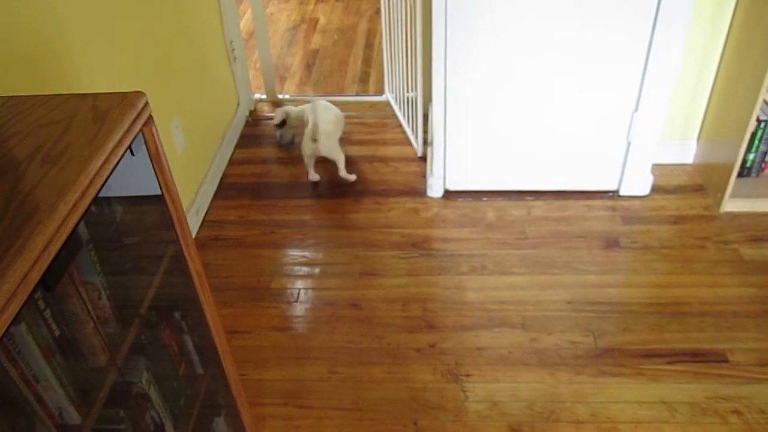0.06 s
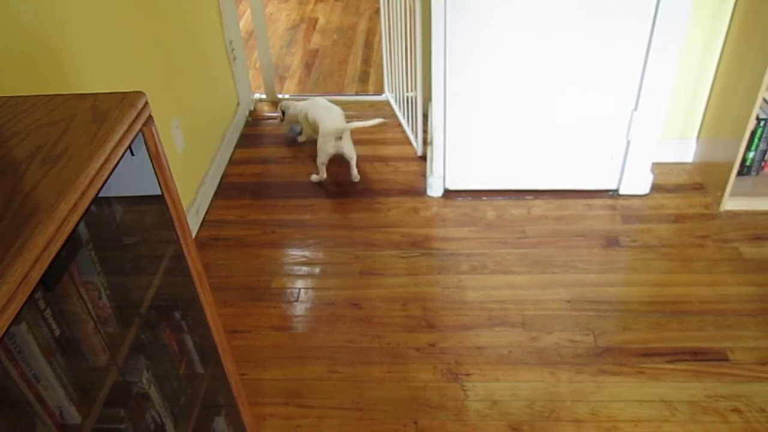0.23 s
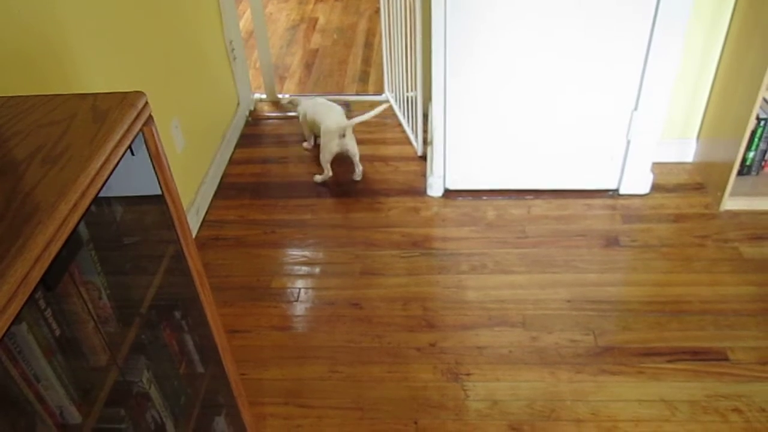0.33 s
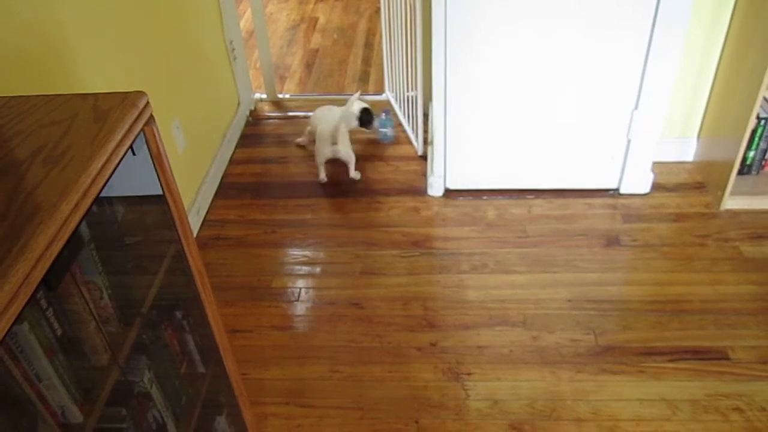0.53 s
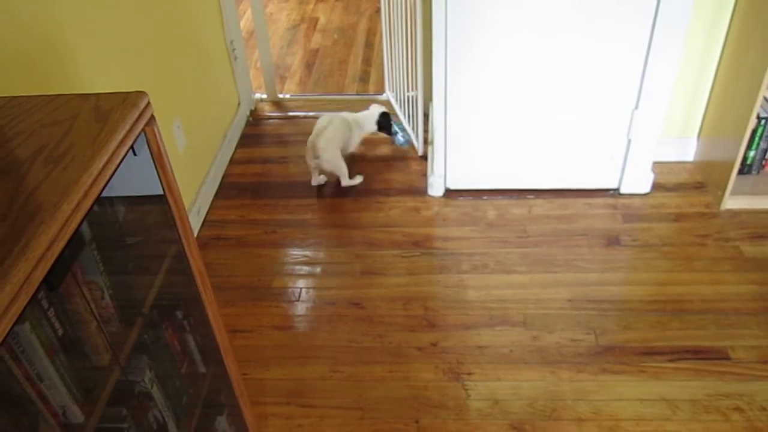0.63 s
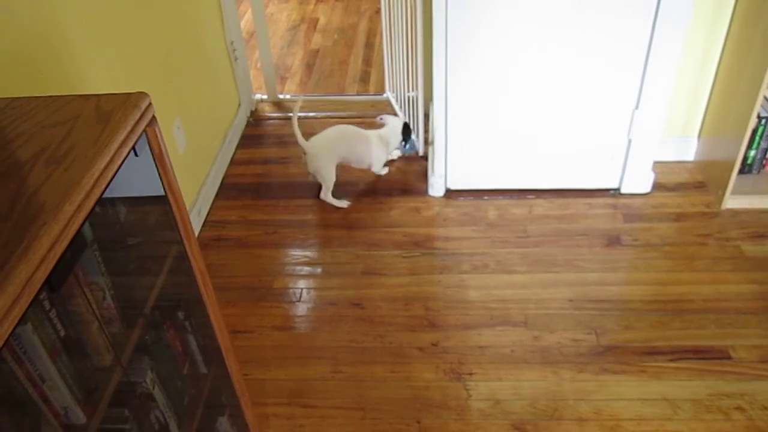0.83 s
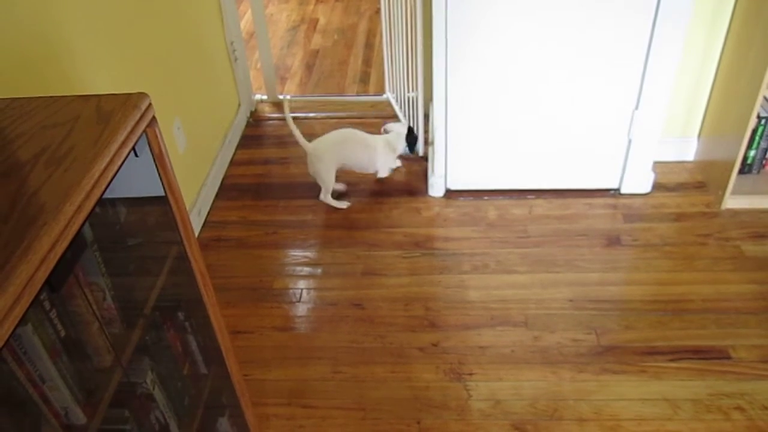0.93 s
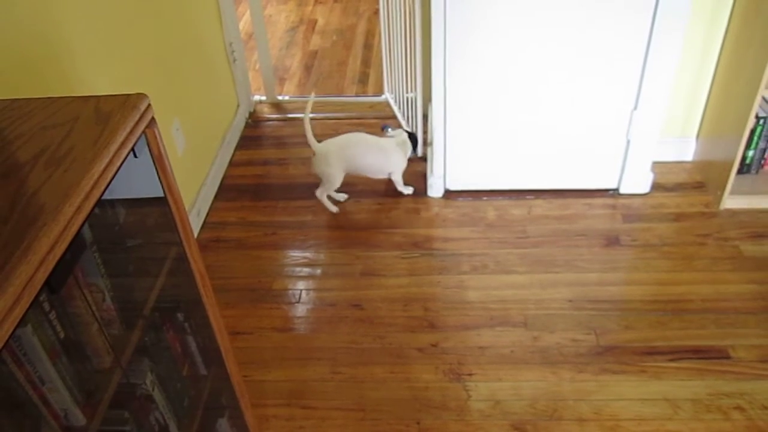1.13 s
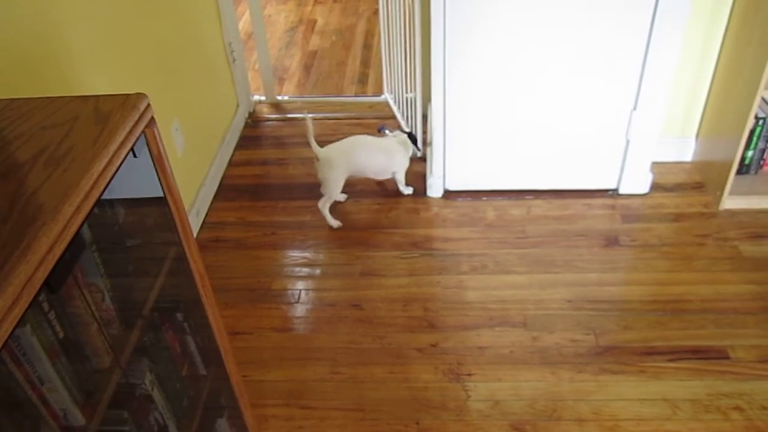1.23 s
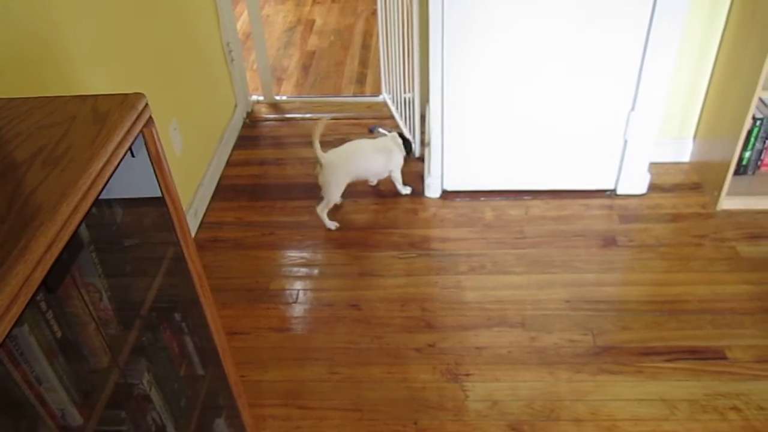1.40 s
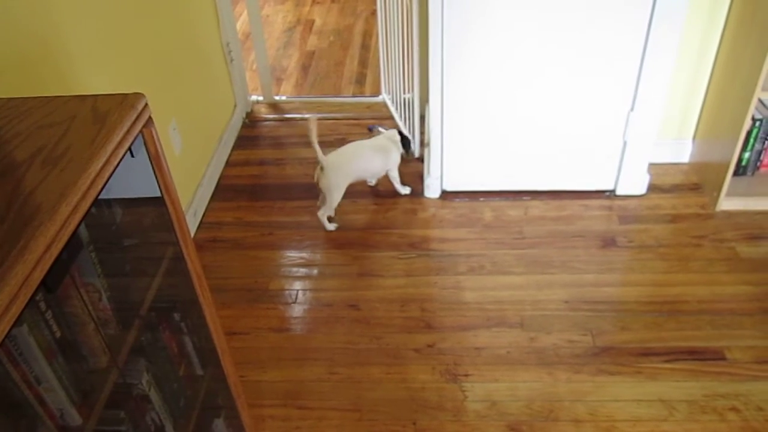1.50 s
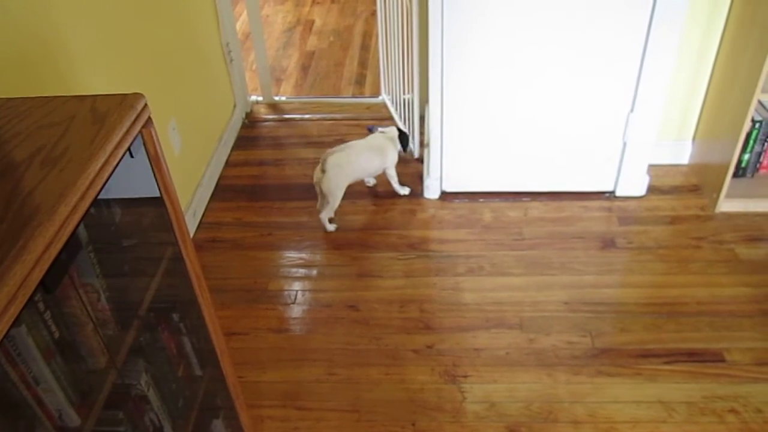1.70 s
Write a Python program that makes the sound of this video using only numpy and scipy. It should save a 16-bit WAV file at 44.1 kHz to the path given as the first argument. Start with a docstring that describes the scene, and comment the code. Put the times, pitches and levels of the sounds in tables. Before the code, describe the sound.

An empty plastic bottle scuffs along a wooden floor, its thin wall crackling sharply at about 0.2 seconds. At 0.5 seconds it lands one loud, hollow knock, then skitters with lighter taps around 0.8 seconds. After a quieter moment, duller bumps cluster near 1.4 seconds. A puppy's paws thump and claws tick throughout, a few metres away in a slightly echoing room with a low hush.

```python
"""A live room with a wooden floor, the microphone a few metres from a puppy chasing an empty plastic bottle.
The bottle scuffs along in tiny slips, a dent in its thin wall snaps, and it lands one hollow knock
that rings its air column and wall; then it skitters on and bumps to rest by a gate.
Paws thump the boards and claws tick between the knocks, over the low hush of the house."""
import sys
import numpy as np
from scipy import signal
from scipy.fft import rfft, irfft
from scipy.io import wavfile

SR = 44100
rng = np.random.default_rng(int(sys.argv[2]) if len(sys.argv) > 2 else 0)


def store_wav(level_fs):
    """Save 16-bit WAV to argv[1]."""
    pcm = np.round(np.clip(np.atleast_2d(level_fs), -1, 1) * 32767)
    wavfile.write(sys.argv[1], SR, pcm.T.astype(np.int16))


N = 77175

# room tone of the house (frequency [Hz], density [dB])
HUSH_SPECTRUM = [(20, -34), (45, -7), (70, -5), (130, -4.5), (300, -4.5), (700, -19), (2000, -25),
                 (6000, -36.5), (15000, -44.5)]
# bottle and paws sliding (start [s], length [s], level [dB], swell [dB], ring over hiss [dB])
SLIDES = [(0, 0.081, -49.5, -11.5, -5.5), (0.123, 0.084, -41, 11.5, -0.5), (0.194, 0.067, -33, 9, -29),
          (0.268, 0.17, -42, -9, -7), (0.411, 0.21, -44.5, -2.5, -5), (0.738, 0.123, -43, 4.5, 3.5),
          (0.973, 0.039, -50.5, -8, -4), (1.022, .12, -50.5, -6, -4), (1.161, 0.066, -52.5, -2.5, 0.5),
          (1.326, .09, -53, 8, 9.5), (1.417, 0.081, -44, -5, -4.5)]
# hiss of sliding (frequency [Hz], density [dB])
SLIDE_SPECTRUM = [(150, -1.5), (600, 4), (1400, 2.5), (2300, 5), (3000, 1.5), (4000, -1.5), (6300, -2.5),
                  (8000, -7), (12000, -10.5), (16000, -26.5)]
# paws and bottle on the boards (time [s], level [dB], treble cutoff [Hz])
FLOOR_THUMPS = [(.002, -39, 220), (0.118, -32.5, 288), (0.149, -33, 238), (0.177, -31, 706),
                (.222, -31.5, 895), (0.253, -36.5, 600), (.445, -37.5, 243), (0.534, -38, 400),
                (0.661, -38.5, 300), (.735, -37, 290), (.775, -35.5, 256), (.84, -32.5, 440),
                (0.896, -33, 296), (.975, -37, 450), (1.071, -41, 400), (1.3, -46.5, 300),
                (1.394, -35.5, 600), (1.425, -28, 554), (1.447, -27.5, 680), (1.476, -31, 600)]
# the floorboards' response (frequency [Hz], density [dB])
BOARD_SPECTRUM = [(40, -9), (100, -20.5), (155, 1.5), (210, -2.5), (330, -2), (480, 5), (580, -5),
                  (680, -4.5), (1200, -12), (4000, -56)]
# bottle contacts, levels before dulling (time [s], ring [dB], slap [dB], treble cutoff [Hz])
BOTTLE_KNOCKS = [(.119, -42, -39.5, 1970), (.19, -41, -40.5, 1230), (.236, -39, -36, 2500),
                 (.49, -45, -38, 990), (0.5328, -8, -11.5, 13800), (.575, -20, -42, 810),
                 (.612, -23.5, -43, 900), (.734, -30.5, -50, 1800), (0.7948, -33, -37, 2910),
                 (.823, -28.5, -30, 2040), (.853, -27.5, -51, 1100), (.885, -37, -37, 1090),
                 (1.3091, -36, -49, 2560), (1.332, -48, -40.5, 2520), (1.3692, -29, -47, 697),
                 (1.398, -27, -37, 694), (1.4225, -17, -23, 705), (1.447, -22, -38, 674),
                 (1.466, -27.5, -27.5, 940)]
# the bottle's air column and wall (frequency [Hz], level [dB], t60 [s])
BOTTLE_MODES = [(498.4, -12, 0.082), (650, -18, 0.13), (754, -13, 0.11), (823, -12, 0.16), (872.7, -3, 0.2),
                (924.4, -3.5, 0.15), (995, -17.5, 0.087), (1677, -15, 0.047), (1742, -6.5, .13),
                (1803, -11, 0.074), (1954, -20, 0.34), (2220, -10.5, 0.067), (2440, -42, 0.11)]
# flat slap of the plastic (frequency [Hz], density [dB])
SLAP_SPECTRUM = [(100, -29), (450, -26.5), (680, -24), (850, 6.5), (1100, 1), (1400, -5), (1750, 4),
                 (2250, -6.5), (2800, -13.5), (5400, -31), (7000, -16), (8500, -31.5), (12000, -26),
                 (16000, -36)]
# claws on wood and plastic (time [s], level [dB])
CLAW_TICKS = [(.1191, -39), (.1575, -38.5), (.1815, -37.5), (.46, -42), (.495, -38), (.538, -27.5),
              (.632, -36), (.7345, -37.5), (.7955, -37.5), (.821, -54), (1.0261, -48), (1.0705, -40.5),
              (1.078, -47), (1.178, -49), (1.306, -46.5), (1.4225, -41.5), (1.475, -40)]
# one claw tick (frequency [Hz], density [dB])
CLAW_SPECTRUM = [(300, -2), (1500, 3.5), (4000, -0.5), (9000, -3), (12000, -10), (16000, -19)]
# dents snapping (time [s], level [dB])
DENT_SNAPS = [(.2205, -31), (.2354, -19.5), (.2408, -20.5), (.2565, -24), (.5335, -30.5)]
# one snap (frequency [Hz], density [dB])
SNAP_SPECTRUM = [(200, -27), (900, -14), (2200, 7), (2900, 0.5), (3600, 8), (5200, 4), (6400, 6),
                 (7300, -3.5), (12000, -6.5), (16000, -44)]
# the room's decay (frequency [Hz], t60 [s])
ROOM_DECAY = [(100, 0.89), (400, 0.39), (900, 0.52), (2000, 0.72), (5000, 0.54), (9000, 0.58),
              (15000, 0.41)]
# reverberation at the microphone (frequency [Hz], tail over direct sound [dB])
ROOM_BALANCE = [(150, 2.5), (900, 0.5), (1800, -2.5), (4000, 2.5), (12000, -3.5)]
# echoes off the near walls (mean delay [s])
WALL_ECHOES = [.0031, .0068, .0135, .0215]

EVENT_SAMPLES = 32768
FFT_SIZE = EVENT_SAMPLES + EVENT_SAMPLES // 4
T = np.arange(EVENT_SAMPLES) / SR
HZ = np.fft.rfftfreq(FFT_SIZE, 1 / SR)


def amp(db):
    """Decibels to gain."""
    return 10 ** (np.asarray(db) / 20)


def along(points, hz):
    """Read a curve on a log frequency axis."""
    freqs, values = np.transpose(points)
    return np.interp(np.log(hz + 1), np.log(freqs), values)


def blow(x):
    """Scale a sound to the energy of 5 ms at full level."""
    return x * np.sqrt(.005 * SR / np.sum(x ** 2))


def colour(spectrum):
    """Causal frequency response with the given shape."""
    cepstrum = irfft(np.log(amp(along(spectrum, HZ))), FFT_SIZE)
    cepstrum[1:FFT_SIZE // 2] *= 2
    cepstrum[FFT_SIZE // 2 + 1:] = 0
    return np.exp(rfft(cepstrum))


def filtered(x, response):
    """A short sound through a frequency response."""
    return irfft(rfft(x, FFT_SIZE) * response, FFT_SIZE)[:EVENT_SAMPLES]


def convolved(x, answer):
    """A short sound through an impulse response."""
    return signal.fftconvolve(x, answer)[:EVENT_SAMPLES]


def add(out, s, x):
    """Mix x into out from time s."""
    i = max(round(s * SR), 0)
    out[i:i + len(x)] += x[:N - i]


def room_tail(build_s=.0092):
    """The diffuse answer of the room, new for every spot on the floor."""
    hz, t, noise = signal.stft(rng.standard_normal(EVENT_SAMPLES), SR, nperseg=256)
    fade = amp(-60 * t / along(ROOM_DECAY, hz)[:, None]) * (1 - np.exp(-t / build_s))
    energy = np.sum(fade ** 2, axis=1, keepdims=True) * t[1] * SR
    fade *= amp(along(ROOM_BALANCE, hz))[:, None] / np.sqrt(energy)
    return signal.istft(noise * fade, SR)[1][:EVENT_SAMPLES]


def in_room(x, echo_db=-15.5):
    """What reaches the microphone: direct sound, near walls and the diffuse tail."""
    answer = room_tail()
    answer[0] += 1
    for s in WALL_ECHOES:
        answer[round(s * rng.uniform(.9, 1.1) * SR)] += amp(echo_db)
    return convolved(x, answer)


def pulse(response):
    """One clean pulse of the given colour."""
    return blow(irfft(response, FFT_SIZE)[:EVENT_SAMPLES])


def burst(response, t60_s):
    """A fast-dying puff of coloured noise."""
    return blow(filtered(rng.standard_normal(EVENT_SAMPLES) * amp(-60 * T / t60_s), response))


def crack(response, t60_s):
    """A short burst and the room's wash of the same colour."""
    return burst(response, t60_s) + convolved(pulse(response), room_tail())


def house_hush(level_db=-47):
    """Room tone: the low steady noise of the house."""
    shape = amp(along(HUSH_SPECTRUM, np.fft.rfftfreq(N, 1 / SR)))
    noise = irfft(rfft(rng.standard_normal(N)) * shape, N)
    return amp(level_db) * noise / noise.std()


def bottle_ring(attack_s=.00074):
    """The hollow ring of air column and wall, a little different at every contact."""
    ring = 0
    for hz, db, t60 in BOTTLE_MODES:
        decay = amp(db + rng.normal(0, 1) - 60 * T / t60)
        ring += decay * np.sin(2 * np.pi * (hz * T + rng.random()))
    return blow(ring * (1 - np.exp(-T / attack_s)))


def scuffs(slips_per_s=2500, spread_db=4, edge_s=.005):
    """Sliding is a stream of tiny slips that hiss and also ring the bottle."""
    out, rasp = np.zeros(N), colour(SLIDE_SPECTRUM)
    for s, length, db, swell_db, ring_db in SLIDES:
        slips = (rng.random(EVENT_SAMPLES) < slips_per_s / SR) * rng.choice([-1, 1], EVENT_SAMPLES)
        slips = slips * amp(spread_db * rng.standard_normal(EVENT_SAMPLES))
        edges = np.clip(np.minimum(T, length - T) / edge_s, 0, 1)
        slips *= edges * amp(swell_db * np.minimum(T / length, 1))
        hiss = filtered(slips, rasp)
        ring = convolved(slips, bottle_ring())
        slide = hiss / np.linalg.norm(hiss) + amp(ring_db) * ring / np.linalg.norm(ring)
        add(out, s, amp(db) * np.sqrt(length * SR) * in_room(slide))
    return out


def floor_thumps():
    """Padded blows on the floorboards: the softer the paw, the less treble."""
    out, boards = np.zeros(N), colour(BOARD_SPECTRUM)
    for s, db, cutoff in FLOOR_THUMPS:
        padded = boards / (1 + 1j * np.sqrt(2) * HZ / cutoff - (HZ / cutoff) ** 2)  # two-pole low-pass
        add(out, s, amp(db) * crack(padded, t60_s=.13))
    return out


def bottle_knocks(ring_room_db=-1.5, chatter_db=-6):
    """Each contact slaps the plastic, which chatters, and rings the bottle; soft ones lose treble."""
    out, plastic = np.zeros(N), colour(SLAP_SPECTRUM)
    for s, ring_db, slap_db, cutoff in BOTTLE_KNOCKS:
        ring = bottle_ring()
        ring += amp(ring_room_db) * convolved(ring, room_tail())
        slap = in_room(pulse(plastic)) + amp(chatter_db) * burst(plastic, t60_s=.024)
        dulling = signal.butter(2, cutoff, fs=SR, output="sos")
        add(out, s, signal.sosfilt(dulling, amp(ring_db) * ring + amp(slap_db) * slap))
    return out


def claw_ticks():
    """Hard claws tick and scratch on wood and plastic."""
    out, claw = np.zeros(N), colour(CLAW_SPECTRUM)
    for s, db in CLAW_TICKS:
        add(out, s, amp(db) * crack(claw, t60_s=.068))
    return out


def dent_snaps():
    """Dents in the bottle's thin wall snap with a short, bright crack."""
    out, snap = np.zeros(N), colour(SNAP_SPECTRUM)
    for s, db in DENT_SNAPS:
        add(out, s, amp(db) * crack(snap, t60_s=.034))
    return out


def scene():
    """Bottle, puppy and room tone at one microphone a few metres off."""
    bottle = bottle_knocks() + dent_snaps() + scuffs()
    puppy = floor_thumps() + claw_ticks()
    return (bottle + puppy + house_hush())[None]


def record(dry):
    """The highest peaks are rounded off and the top of the treble is cut steeply."""
    ceiling, top_hz = .76, 15850
    rounded = dry / (1 + np.abs(dry / ceiling) ** 8) ** (1 / 8)
    band_limit = 1 / (1 + (np.fft.rfftfreq(2 * N, 1 / SR) / top_hz) ** 200)
    return irfft(rfft(rounded, 2 * N) * band_limit)[:, :N]


dry = scene()
out = record(dry)
store_wav(out)
```